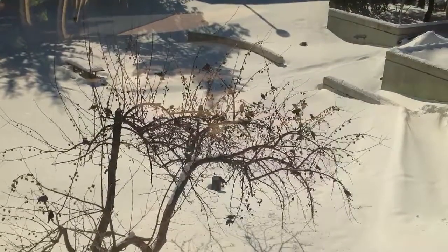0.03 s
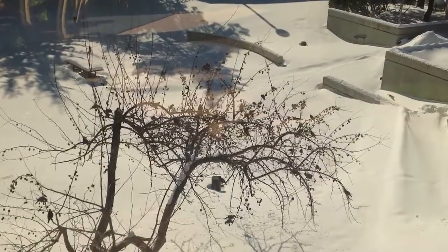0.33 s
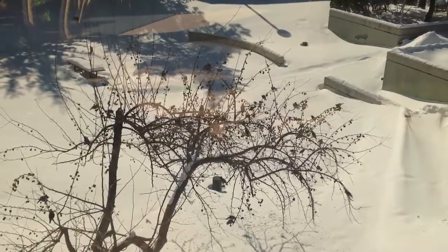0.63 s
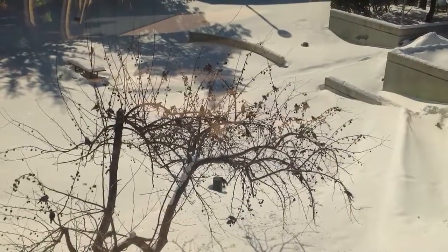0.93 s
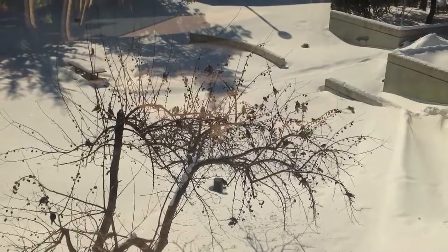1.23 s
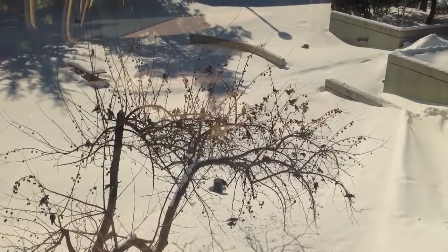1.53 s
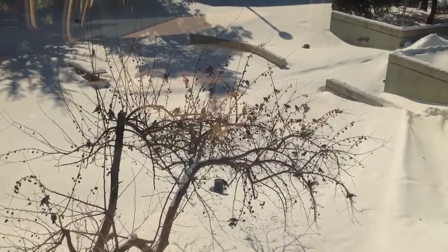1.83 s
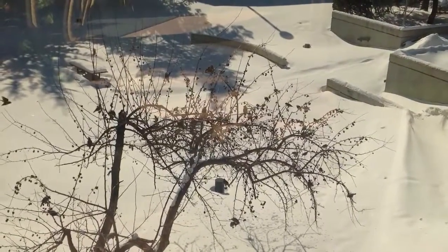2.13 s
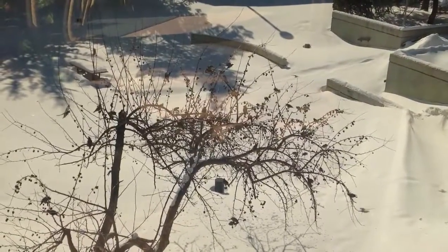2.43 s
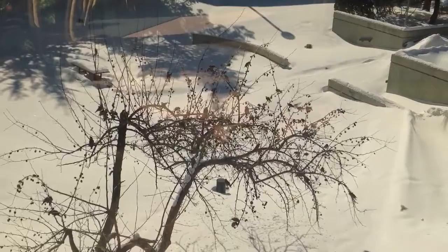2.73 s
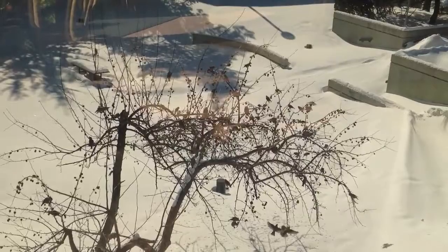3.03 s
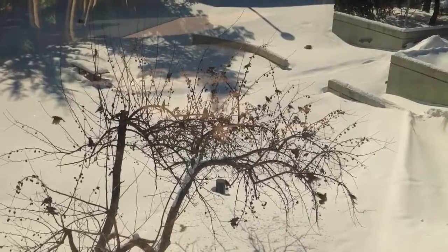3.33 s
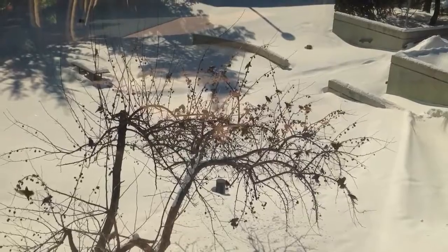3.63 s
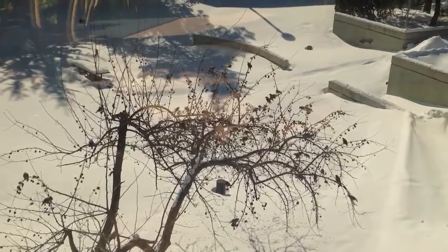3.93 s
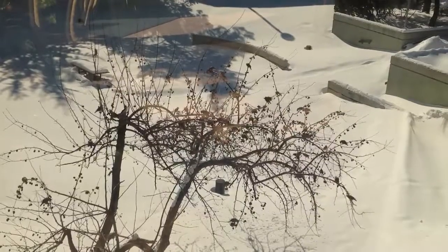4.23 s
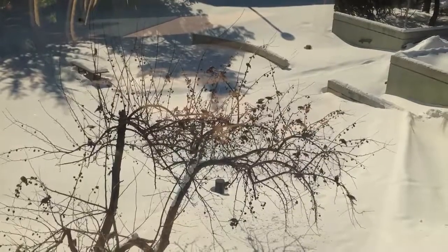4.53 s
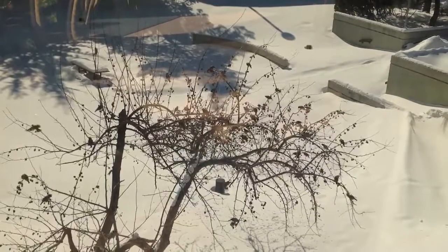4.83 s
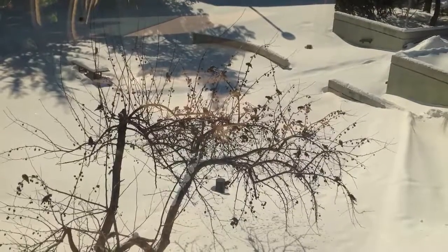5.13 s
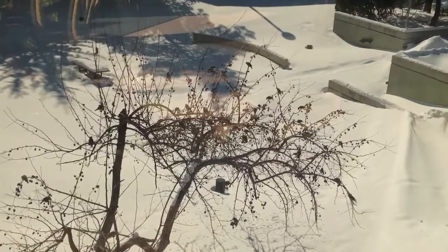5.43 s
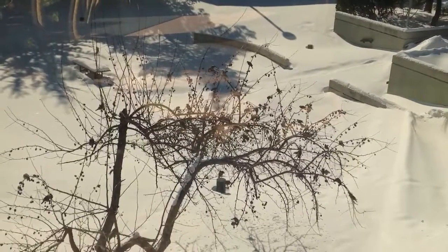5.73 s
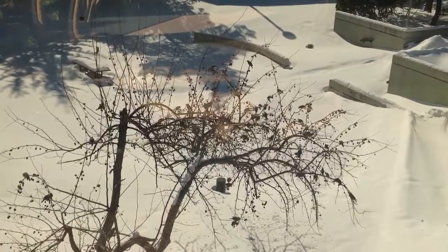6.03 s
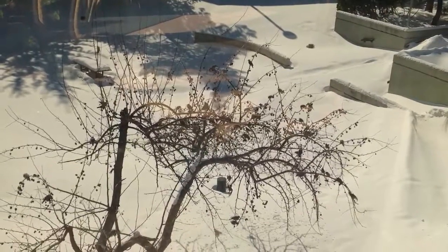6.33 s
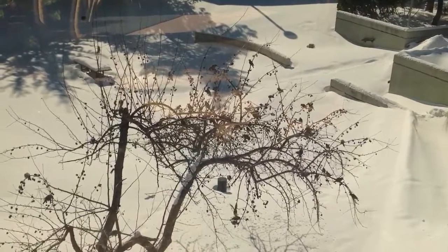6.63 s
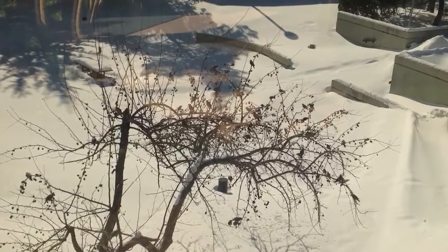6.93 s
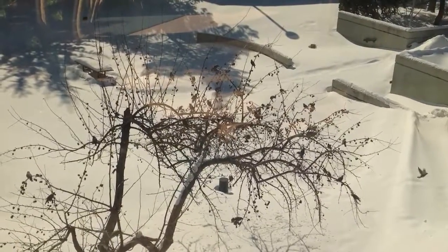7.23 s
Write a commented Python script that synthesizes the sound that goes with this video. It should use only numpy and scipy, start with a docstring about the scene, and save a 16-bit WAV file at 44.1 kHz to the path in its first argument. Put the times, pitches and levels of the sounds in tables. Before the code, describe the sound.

The sound opens with light finger touches on a camera housing, right at the microphone. At about 0.2 seconds the camera lands on its stand with a thud and a short ringing clatter, the loudest moment. From about 0.4 seconds it rocks through six quick bumps, each sooner, weaker and duller, settling before 1 second. What remains, present from start to finish, is a quiet room: low ventilation rumble, slight electrical hum, and the camera's thin whirr and steady hiss, all faint. At about 4.2 seconds a panel is knocked farther away, giving a dull, soft boom in the room, with a much weaker knock just after. Two faint clicks come around 5.5 seconds, a small cluster of brighter ticks around 6.4 to 6.5, and one duller click near 7. The hum and hiss continue to the end, at about 7.5 seconds.

```python
"""A quiet room, heard from the microphone of a camera at a window. Right at the microphone,
fingers let go of the camera; it lands on its stand and rocks to rest, each bump ringing housing
and stand. That leaves the low hum of ventilation and the camera's own whirr and hiss, there all along.
Past four seconds a panel is knocked farther off and the room booms dully; a few weak clicks follow."""
import sys
import numpy as np
from scipy import signal
from scipy.fft import rfft, irfft, next_fast_len
from scipy.io import wavfile
from scipy.ndimage import map_coordinates

SR = 44100
rng = np.random.default_rng(int(sys.argv[2]) if len(sys.argv) > 2 else 0)


def persist_wave(psi):
    """Save psi, clipped to +-1, as 16-bit WAV."""
    counts = np.round(np.clip(psi, -1, 1) * 32767).astype(np.int16)
    wavfile.write(sys.argv[1], SR, np.atleast_2d(counts).T)


N = 325017


def rocking(start_s, count):
    """The camera rocks to rest on its foot: each bump comes sooner, weaker and duller."""
    first_gap_s, shortest_gap_s, gap_shrink = 0.098, 0.052, 0.36
    out, age_s = np.zeros(N), 0
    for k in range(count):
        out += bump(start_s + age_s, thud_db=-32.5 - 68 * age_s, clatter_db=-38.5 - 79 * age_s,
                    tilt_db=-1.75 - 7 * age_s, emphasis_db=7)
        age_s += shortest_gap_s + (first_gap_s - shortest_gap_s) * gap_shrink ** k
    return out


def bump(start_s, thud_db, clatter_db, tilt_db, emphasis_db):
    """Camera meets stand, right at the microphone: an edge grazes, the blow lands, the weight follows."""
    foot_hz = 1450
    hard = contact_colour(tilt_db, foot_hz, emphasis_db)
    soft = contact_colour(tilt_db - 3.5, foot_hz, emphasis_db)
    graze = clatter(clatter_db - 9, hard)
    blow = thud(thud_db) + clatter(clatter_db, hard)
    weight = thud(thud_db - 8) + clatter(clatter_db - 13.5, soft)
    out = np.zeros(N)
    for delay_s, sound in [(-0.008, graze), (0, blow), (0.029, weight)]:
        add(out, start_s + delay_s, sound, rise_s=0.0083)
    return out


# Low modes of the stand under the microphone: pitch_hz, relative_db, t60_s
STAND_MODES = [(128, -9, .42), (168, -9, .4), (209, 1, .3), (234, -6, .3), (330, -8, .27), (431, 0, .21),
               (484, -2, .27), (525, -11, .22)]
# Dense ringing between those modes: frequency_hz, density_db
THUD_SPECTRUM = [(25, -30), (65, -41), (100, -5), (200, 0.5), (320, -3), (480, 3.5), (680, -23),
                 (1500, -42)]

def thud(level_db):
    """A contact thuds through the stand."""
    return amp(level_db) * (amp(-3) * ring(STAND_MODES) + amp(-5.5) * wash(THUD_SPECTRUM))


# Modes of the housing around the microphone: pitch_hz, relative_db, t60_s
HOUSING_MODES = [(798, -3, .3), (1033, -2, .25), (1172, 0, .28), (1231, 0, .28), (1328, 1, .3),
                 (1389, 0, .26), (1518, -1, .22), (1636, -1, .27), (1694, -2, .26), (1970, 0, .32),
                 (2137, -5, .24), (2336, -4, .24), (2541, -5, .24), (2799, -7, .22), (3005, -4, .22),
                 (4377, -8, .18), (5055, -5, .24), (5496, -4, .18), (5809, -4, .2), (6304, -9, .45)]
# Dense ringing between those modes: frequency_hz, density_db
CLATTER_SPECTRUM = [(100, -42), (450, -7), (700, -3.5), (1200, -2), (2000, 0.5), (3300, -4.5), (4600, -4),
                    (5800, -1.5), (7000, -5.5), (10000, -10), (15500, -20)]

def clatter(level_db, colour):
    """A contact rattles the housing."""
    clack = amp(-4) * ring(HOUSING_MODES, colour)
    return amp(level_db) * (clack + amp(-1.5) * wash(CLATTER_SPECTRUM, colour=colour))


# Light touches beside the microphone: start_s, thud_db, clatter_db, tilt_db_per_octave
FINGER_TOUCHES = [(-0.008, -50, -46.5, -3), (0.026, -47.5, -53, -1), (0.054, -72, -55, -3),
                  (0.085, -51, -40.5, 1.5), (0.270, -48, -46, -2.5)]

def fingers():
    """Fingers touch the housing as they let go of it."""
    out = np.zeros(N)
    for start_s, thud_db, clatter_db, tilt_db in FINGER_TOUCHES:
        colour = contact_colour(tilt_db, pitch_hz=3050, emphasis_db=5)
        add(out, start_s, thud(thud_db) + clatter(clatter_db, colour), rise_s=0.01)
    return out


# Dull blows on a panel farther off: start_s, level_db, rise_s
PANEL_KNOCKS = [(4.217, -53, 0.0047), (4.224, -38, 0.0099), (4.449, -58.5, 0.012)]
# Modes of that panel: pitch_hz, relative_db, t60_s
PANEL_MODES = [(207, -13, .65), (392, 0, .15), (549, -15, .25), (594, -5, .18), (721, -13, .2),
               (837, -13, .25), (989, -20, .25), (1300, -22, .17), (1451, -23, .15)]
# The room's low answer: frequency_hz, density_db
BOOM_SPECTRUM = [(50, -43), (140, 3), (260, 4.5), (450, -7), (800, -12), (1100, -17), (1600, -24),
                 (3000, -44)]

def knocks():
    """A panel is knocked some way from the microphone and the room booms after it."""
    out = np.zeros(N)
    for start_s, level_db, rise_s in PANEL_KNOCKS:
        add(out, start_s, amp(level_db) * ring(PANEL_MODES), rise_s)
        add(out, start_s, amp(level_db - 9) * wash(BOOM_SPECTRUM, decay_scale=1.46), 4 * rise_s)
    return out


# Weak clicks in the room: start_s, level_db, tilt_db_per_octave, pitch_hz, rise_s
WEAK_CLICKS = [(5.43, -51, -2.5, 1900, 0.004), (5.571, -59.5, -5, 1900, 0.009),
               (6.371, -59, 0, 4300, 0.0036), (6.432, -55, 0.5, 6000, 0.016), (6.463, -57, 2, 6000, 0.015),
               (6.496, -52, 0.5, 5140, 0.0072), (6.960, -57, -4.5, 2100, 0.011)]
# The ringing they share, before each is coloured: frequency_hz, density_db
CLICK_SPECTRUM = [(150, -28), (450, 0), (1000, -7.5), (2500, -7), (5000, -10.5), (9000, -13.5),
                  (15500, -18)]

def clicks():
    """Light contacts reach the microphone mostly by way of the room."""
    out = np.zeros(N)
    for start_s, level_db, tilt_db, pitch_hz, rise_s in WEAK_CLICKS:
        colour = contact_colour(tilt_db, pitch_hz, emphasis_db=7)
        add(out, start_s, amp(level_db) * wash(CLICK_SPECTRUM, decay_scale=0.77, colour=colour), rise_s)
    return out


# Ventilation as it reaches the window: frequency_hz, density_db
VENT_SPECTRUM = [(25, -60), (45, -70), (70, -18), (90, -14), (125, -6.5), (160, 2), (195, 0), (240, -4.5),
                 (330, -9), (500, -14.5), (750, -21), (1500, -23.5), (4000, -48)]

def ventilation():
    """Room tone: ventilation rumbles over a faint mains hum, both wavering slightly."""
    rumble = amp(-59.5 + 0.22 * wobble(4.72)) * noise(lambda hz: amp(along(VENT_SPECTRUM, hz)), N)
    mains_hz = 120
    hum_gain = amp(-71.5 + wobble(1.86))
    hum_phase = 2 * np.pi * mains_hz * np.arange(N) / SR + 0.17 * wobble(3)
    return rumble + hum_gain * unit(np.sin(hum_phase))


# Resonances of the whirr inside the camera: pitch_hz, half_width_hz, relative_db
WHIRR_PEAKS = [(1843, 55, 0), (2276, 36, 2), (2488, 133, 0), (3100, 61, -4.5), (3930, 140, -7.5),
               (4860, 120, -4), (5190, 94, 1), (5410, 88, -1.5), (5730, 76, -5), (5945, 69, -2.5),
               (6240, 170, -6)]

def camera_whirr():
    """The camera whirrs in narrow resonances, close to its own microphone."""
    def peaks(hz):
        return np.sqrt(sum(amp(db) ** 2 / (1 + ((hz - pitch_hz) / half_width_hz) ** 2) ** 2
                           for pitch_hz, half_width_hz, db in WHIRR_PEAKS))
    # reflections add up in and out of phase, leaving a fine, steady ripple in the colour
    steps_hz = np.arange(0, SR / 2, 16)
    ripple_db = rng.uniform(-7, 7, len(steps_hz))
    return amp(-69) * noise(lambda hz: peaks(hz) * amp(np.interp(hz, steps_hz, ripple_db)), N)


# Noise floor behind the microphone: frequency_hz, density_db
HISS_SPECTRUM = [(100, -7), (900, 4), (1500, 4), (2800, 5), (3600, 1.5), (6500, 1), (9000, -1),
                 (15500, -2.5)]

def amplifier_hiss():
    """The camera's amplifier hisses steadily."""
    return amp(-65.5) * noise(lambda hz: amp(along(HISS_SPECTRUM, hz)), N)


# The room's decay, before decay_scale stretches it: frequency_hz, t60_s
ROOM_DECAY = [(100, 1), (250, 0.21), (600, 0.5), (2000, 0.29), (5000, 0.3), (9000, .2), (15000, 0.28)]

def wash(spectrum, decay_scale=1.0, colour=np.zeros_like):
    """One second of dense ringing in the room; the bass lasts longest."""
    burst = noise(lambda hz: amp(along(spectrum, hz) + colour(hz)), SR)
    hz, t, bands = signal.stft(burst, SR, nperseg=256)
    t60_s = decay_scale * along(ROOM_DECAY, hz)[:, None]
    fade = np.exp(-np.log(1000) * t / t60_s)
    return signal.istft(bands * fade, SR, nperseg=256)[1][:SR]


def ring(modes, colour=np.zeros_like):
    """One second of a struck body's decaying modes, starting at rms 1."""
    t = np.arange(SR) / SR
    hz, db, t60_s = np.transpose(modes)[:, :, None]
    gain = amp(db + colour(hz) + rng.normal(0, 1, hz.shape))
    waves = np.sin(2 * np.pi * (hz * t + rng.random(hz.shape)))
    fade = np.exp(-np.log(1000) * t / t60_s)
    return np.sum(gain * waves * fade, axis=0) / np.sqrt(np.sum(gain ** 2) / 2)


def contact_colour(tilt_db, pitch_hz, emphasis_db):
    """Colour in dB: a harder touch is brighter (tilt_db per octave); the touched spot favours one band."""
    slope = lambda hz: tilt_db * np.log2(np.clip(hz, 500, 8000) / 2000)
    return lambda hz: slope(hz) + emphasis_db / (1 + (np.log2((hz + 1) / pitch_hz) / 0.36) ** 2)


def add(track, start_s, sound, rise_s):
    """Lay a sound into the track; a soft contact swells over its rise time."""
    progress = np.clip(np.arange(len(sound)) / SR / rise_s, 0, 1)
    swell = np.sin(np.pi / 2 * progress ** 1.96)
    start = round(start_s * SR)
    part = (sound * swell)[max(-start, 0):N - start]
    track[max(start, 0):][:len(part)] += part


def amp(db):
    """Decibels to gain."""
    return 10 ** (np.asarray(db) / 20)


def unit(x):
    """Scale to rms 1."""
    return x / np.sqrt(np.mean(x ** 2) + 1e-20)


def along(points, hz):
    """Join (frequency_hz, value) points on a log frequency axis."""
    points_hz, values = np.transpose(points)
    return np.interp(np.log(hz + 1), np.log(points_hz), values)


def filtered(x, response):
    """Apply a gain that depends on frequency."""
    size = next_fast_len(len(x) + SR // 2)
    return irfft(rfft(x, size) * response(np.fft.rfftfreq(size, 1 / SR)), size)[:len(x)]


def noise(response, size):
    """Coloured noise of rms 1."""
    return unit(filtered(rng.standard_normal(size), response))


def wobble(rate_hz):
    """A smooth random curve with rate_hz knots a second."""
    knots = rng.standard_normal(int(N * rate_hz / SR) + 4)
    return map_coordinates(knots, [np.arange(N) * rate_hz / SR])


def scene():
    """Everything at the camera's one microphone, by the window."""
    touches = fingers()
    landing = bump(start_s=0.182, thud_db=-24, clatter_db=-27, tilt_db=-1.5, emphasis_db=1.2)
    close = touches + landing + rocking(start_s=0.361, count=6)
    room = knocks() + clicks() + ventilation()
    return (close + room + camera_whirr() + amplifier_hiss())[None]


def record(dry):
    """The camera keeps nothing above its band limit."""
    top_hz = 15450
    return np.array([filtered(channel, lambda hz: hz < top_hz) for channel in dry])


dry = scene()
out = record(dry)
persist_wave(out)
```